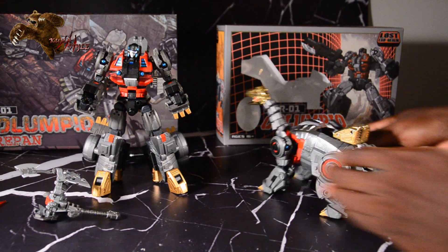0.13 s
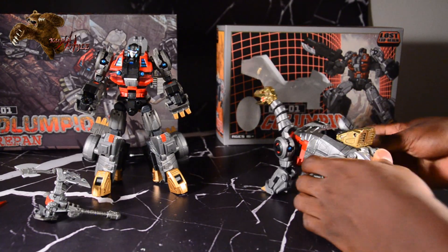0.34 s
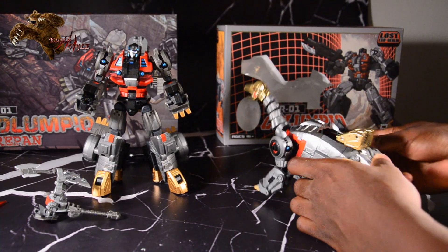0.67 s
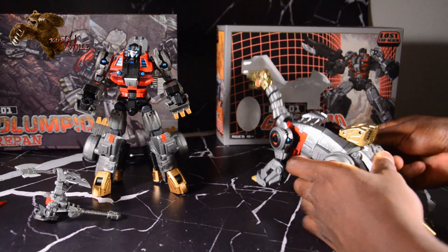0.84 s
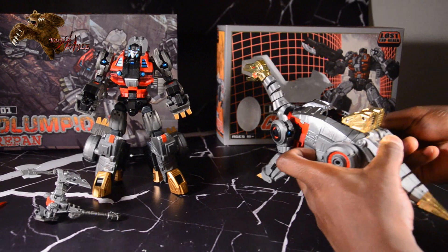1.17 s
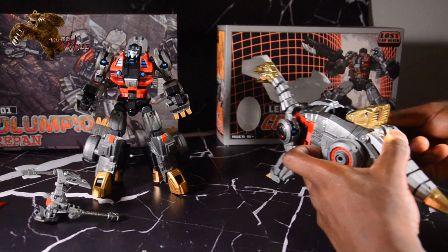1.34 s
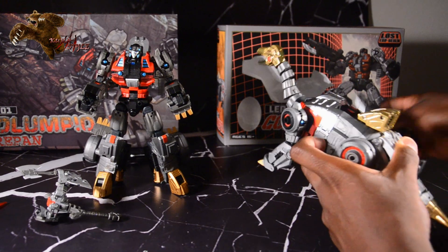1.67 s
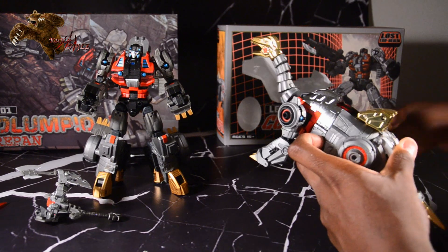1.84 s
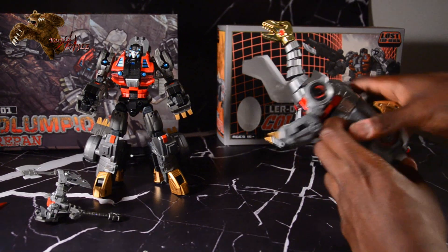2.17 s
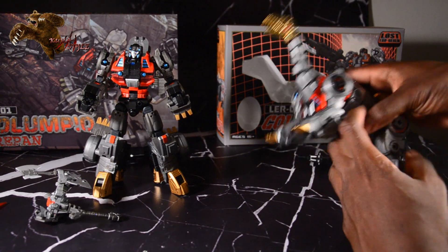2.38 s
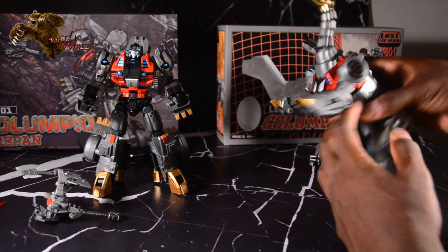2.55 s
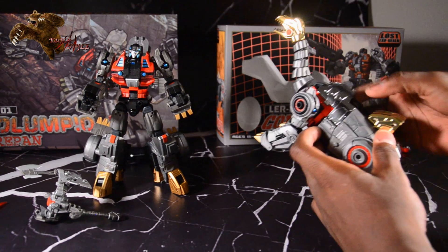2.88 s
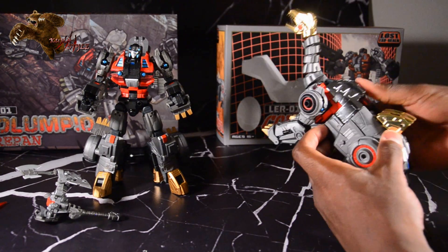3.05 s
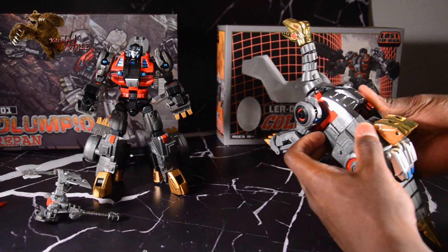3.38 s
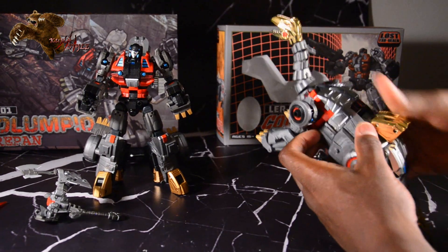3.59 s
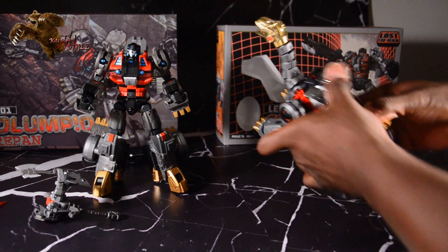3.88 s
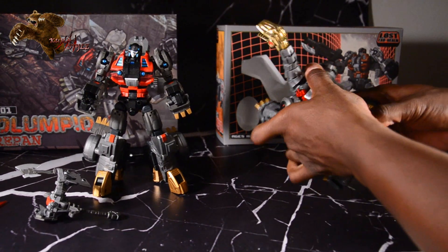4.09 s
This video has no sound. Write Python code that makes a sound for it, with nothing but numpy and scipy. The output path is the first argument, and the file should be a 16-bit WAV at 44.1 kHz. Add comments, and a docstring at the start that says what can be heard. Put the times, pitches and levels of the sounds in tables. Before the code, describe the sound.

Hands turn over a hollow plastic toy, its parts clicking, rattling and snapping over a quiet room hum.

```python
"""A hollow hard-plastic toy clacks and snaps as hands turn it over a table in a small room.
Its feet first drag on the table top with a thin, sinking squeal. Then fingers rub the shell,
joints snap and ring the body, loose parts rattle after each knock and a stiff part scrapes.
A small microphone with narrow dips in the treble hears it over a quiet room hum."""
import sys
import numpy as np
from scipy import signal
from scipy.fft import rfft, irfft
from scipy.io import wavfile

SR = 44100
rng = np.random.default_rng(int(sys.argv[2]) if len(sys.argv) > 2 else 0)


def master(y):
    """Save y as 16-bit WAV."""
    cut = np.clip(np.atleast_2d(y).T, -1, 1)
    pcm = np.round(cut * 32767)  # scale
    wavfile.write(sys.argv[1], SR, pcm.astype(np.int16))


N = 186423

# Rings of the dragging feet: pitch_hz, width_hz, level_db
FOOT_RINGS = [(795, 110, -0.5), (1944, 420, 2.5), (3255, 210, 4.5), (4940, 710, 3.5), (8650, 230, 11)]
# Tone of the room air and microphone hiss: frequency_hz, level_db
AIR_SPECTRUM = [(12, -30), (20, -2.5), (85, -3.5), (137, -2), (191, -0.5), (362, 3), (534, 0), (725, -1),
                (1100, -3), (1580, -3.5), (2330, -10.5), (4810, -16.5), (5690, -20), (7730, -20.5),
                (15500, -29)]
# Fingers shifting their grip: time_s, dull_db, bright_db
GRIP_MOVES = [(.3, -60, -62.5), (.46, -53.5, -59.5), (.61, -63.5, -72), (.7, -57, -58), (.94, -63, -63),
              (1.16, -71.5, -81), (1.43, -57.5, -60.5), (1.62, -65, -61), (1.76, -69, -70), (1.9, -68, -93),
              (2.35, -55, -53.5), (2.47, -64, -69), (2.66, -63.5, -63.5), (2.95, -59.5, -68),
              (3.22, -54, -57.5), (3.36, -62.5, -69.5), (3.53, -67, -75), (3.66, -55.5, -62),
              (3.95, -62.5, -64.5), (4.11, -63.5, -43.5), (4.227, -62, -63)]
# Rings of the rubbed shell: pitch_hz, width_hz, level_db
RUBBED_RINGS = [(354.7, 19.5, 2), (843, 325, -1.5), (1595, 355, -9), (2640, 1230, -8.5), (4690, 980, -6),
                (7580, 1810, -3)]
# Knocks between parts; thud, hollow and treble are offsets from the level:
# start_s, level_db, thud_db, hollow_db, treble_db, low_ring_hz, high_ring_hz, chatter_t60_s
CONTACTS = [(0.319, -38.5, -25, -10.5, -15, 1200, 3980, 0.069),
            (0.336, -32.5, -28, -35, -9, 2470, 4330, 0.034), (0.428, -32, -33, -21, -21, 1670, 4250, 0.048),
            (0.446, -42.5, -13.5, -6, -8, 1430, 5300, 0.08),
            (0.515, -36.5, -27, -16, -12, 1120, 3870, 0.071),
            (0.625, -19, -19, -24.5, -15.5, 2130, 7090, 0.066),
            (0.735, -43, -25, -21, -9, 2170, 8140, 0.029), (0.795, -41.5, -25, -17, -14, 815, 4800, 0.14),
            (0.832, -29.5, -43, -50, -6.5, 1010, 4710, 0.078),
            (0.948, -34, -42, -30, -5, 3180, 4400, 0.036), (1.077, -51, -20, -23, -5, 657, 4750, 0.059),
            (1.092, -53, -17, -30, 2, 1210, 4650, 0.031), (1.133, -45, -30, -16, -9.5, 3400, 4230, 0.076),
            (1.169, -45.5, -35, -21, -15, 1640, 4470, 0.055),
            (1.209, -50.5, -22, -25, -1.5, 1210, 5130, 0.04),
            (1.229, -38.5, -32, -30, -10, 824, 4740, 0.035),
            (1.377, -42, -24, -27, -7.5, 1440, 3970, 0.072), (1.404, -42, -20, -26, -11, 622, 3920, 0.056),
            (1.459, -30, -38, -44, -14.5, 750, 4350, 0.065), (1.481, -25, -38, -46, -10, 2980, 6080, 0.068),
            (1.497, -35, -39, -28, 0, 2900, 4360, 0.039), (1.529, -28, -37, -37, -11.5, 3160, 4400, 0.033),
            (1.572, -46, -15, -29, 1, 2830, 5000, 0.029), (1.607, -39, -28, -35, -11.5, 703, 6130, 0.059),
            (1.623, -35.5, -40, -27, -3.5, 874, 5760, 0.045), (1.751, -52, -24, -24, -8, 1090, 6940, 0.028),
            (1.905, -15, -31, -23, -7, 780, 5300, 0.1), (1.915, -26, -21, 0, 6, 1870, 7520, 0.02),
            (1.927, -4.5, -35, -18.5, -13.5, 826, 4130, 0.042),
            (1.991, -28, -25, -14, -22, 830, 4420, 0.041), (2.065, -2.5, -32, -19, -17, 1410, 7400, 0.043),
            (2.157, -5.5, -34.5, -22, -11.5, 1370, 4620, 0.035),
            (2.19, -22, -25, -16.5, -14.5, 1390, 6590, 0.058),
            (2.224, -23, -30, -36, -13, 1260, 6550, 0.041), (2.26, -32, -19, -8.5, -15, 976, 4970, 0.11),
            (2.29, -37, -18, -9, -18, 1020, 4800, 0.045), (2.325, -32.5, -30, -24, 1.5, 1520, 4110, 0.034),
            (2.376, -39, -34, -33, -18, 1980, 3880, 0.037), (2.44, -54.5, -15, -14, 3.5, 1560, 4560, 0.084),
            (2.591, -44, -17, -17, -9, 2880, 6600, 0.022),
            (2.672, -13.5, -18.5, -14.5, -15, 890, 3870, 0.045),
            (2.765, -25.5, -22, -32, -21, 950, 4030, 0.039),
            (2.779, -23.5, -37, -28, -29, 950, 4100, 0.091), (2.808, -31, -33, -32, -26, 947, 5070, 0.037),
            (2.851, -31.5, -17, -22, -18.5, 720, 6300, 0.044),
            (3.001, -42.5, -24, -21, -3.5, 2600, 6530, 0.04), (3.04, -41, -17, -31, -7, 2360, 7400, 0.03),
            (3.056, -24.5, -30.5, -36, -4, 2830, 7050, 0.048),
            (3.089, -28.5, -47, -16.5, -12, 2730, 3800, 0.062),
            (3.123, -38, -24, -20, -3, 985, 5840, 0.043), (3.199, -31.5, -29, -35, -16.5, 970, 4460, 0.11),
            (3.221, -32.5, -33, -19, -14.5, 1620, 4040, 0.076),
            (3.254, -40.5, -36, -19, -3, 980, 4000, 0.043), (3.3, -44.5, -34, -26, -24, 2560, 4700, 0.058),
            (3.544, -44.5, -38, -25, -6, 3160, 4780, 0.11),
            (3.685, -40.5, -20, -29, -13, 2060, 4940, 0.051),
            (3.721, -26.5, -39, -30, -22, 1100, 3800, 0.029), (3.73, -28, -31, -18, -8, 830, 5800, 0.041),
            (3.775, -29, -47, -22.5, -14.5, 990, 5060, 0.077),
            (3.836, -30, -21, -21, -22, 2680, 5060, 0.024), (3.882, -38, -24, -18, -22, 920, 4700, 0.061),
            (3.903, -51, -25, -11, 8, 635, 6480, 0.04), (3.983, -37, -38, -39, -3.5, 3340, 7700, 0.049),
            (4.016, -35.5, -41, -38, -11, 1570, 6100, 0.036),
            (4.041, -41, -27, -29, 3.5, 1630, 7560, 0.025), (4.049, -43, -32, -29, -10, 1540, 7150, 0.026),
            (4.075, -31.5, -45, -41, 4, 3350, 8470, 0.028),
            (4.102, -34.5, -36.5, -37, -2, 3110, 4500, 0.045),
            (4.156, -33, -33, -45, -2.5, 1630, 7700, 0.03), (4.166, -38.5, -33, -31, -2, 1610, 7830, 0.028)]
# Borders of the seven clack bands (table, hollow, shell, panel, edge, tick, top): edge_hz
CLACK_EDGES_HZ = [120, 320, 600, 1700, 3500, 5700, 10500, 15500]
# Tone shared by all clacks, one value a band: gain_db
CLACK_COLOUR_DB = [3.5, 4, -2.5, -2, 1.5, 3.5, -9]
# Rings of the table top and hollow body: pitch_hz, width_hz, level_db
STRUCK_RINGS = [(144, 11, 3), (293, 30, 13.5), (408, 15, 15), (556, 17, -22), (760, 54, -2), (818, 47, 7.5),
                (955, 62, 0), (1208, 88, 9.5), (1398, 170, 4), (1626, 42, -7), (1702, 73, 5.5),
                (2215, 196, 2.5), (2718, 98, 8), (2990, 214, 1), (4270, 380, -9.5), (4746, 167, 3),
                (4870, 520, -2), (6300, 440, 4.5), (7350, 200, 5), (8030, 470, -0.5), (8600, 270, 2),
                (10700, 120, -26)]
# Stiff part scraping across the shell: start_s, swell_s, end_s, level_db
SCRAPES = [(2.095, 0.033, 2.15, -34.5), (2.176, 0.013, 2.27, -39), (2.768, .01, 2.878, -42),
           (3.774, 0.046, 3.9, -37)]
# Tone of a scrape in the low, mid and bright bands: gain_db
SCRAPE_COLOUR_DB = [-0.5, -3, -15.5]
# Decay of the room: frequency_hz, t60_s
ROOM_DECAY = [(150, 0.3), (400, 0.18), (1000, 0.21), (3000, 0.15), (7000, 0.17), (14000, 0.15)]
# Notches from the microphone housing: centre_hz, width_hz, share_removed
MIC_DIPS = [(5695, 280, 0.78), (6800, 27, 0.29)]


def from_db(db):
    return 10 ** (np.asarray(db) / 20)


def rms_one(x):
    return x / np.sqrt(np.mean(x ** 2) + 1e-20)


def at_hz(points, hz):
    """Read a curve along a log frequency axis."""
    point_hz, values = np.transpose(points)
    return np.interp(np.log(np.maximum(hz, 1)), np.log(point_hz), values)


def butter(x, order, hz, kind="low"):
    return signal.sosfilt(signal.butter(order, hz, kind, fs=SR, output="sos"), x)


def band(x, low_hz, high_hz):
    return butter(x, 3, [low_hz, high_hz], "band")


def resonance(x, hz, width_hz):
    """Two-pole peak of gain 1."""
    r = np.exp(-np.pi * width_hz / SR)
    gain = (1 - r * r) / 2
    return signal.lfilter([gain, 0, -gain], [1, -2 * r * np.cos(2 * np.pi * hz / SR), r * r], x)


def body(x, rings, direct_db):
    """Parallel rings of alternating polarity over the direct sound of the contact."""
    rung = sum((-1) ** k * from_db(db) * resonance(x, hz, width)
               for k, (hz, width, db) in enumerate(rings))
    return rung + from_db(direct_db) * x


def grains(per_s, spread_db):
    """Random micro-impacts of uneven size; rms 1."""
    sizes = from_db(spread_db * np.minimum(rng.exponential(1, N), 4)) * rng.choice([-1, 1], N)
    return rms_one(sizes * (rng.random(N) < per_s / SR) + 1e-18)


def feet_slide(lift_s=0.27, settle_s=0.082, slow_s=0.14):
    """Dense slips ring the feet: the lows swell as the weight settles, the squeal sinks as the drag slows."""
    t = np.arange(N) / SR
    slips = grains(per_s=9000, spread_db=-1)
    rung = body(slips, FOOT_RINGS, direct_db=-7)
    low_db = -37 - 20 * np.maximum(1 - t / settle_s, 0) - 44 * np.maximum(t - settle_s, 0)
    low = from_db(low_db) * rms_one(band(rung, 290, 3120))
    panel = from_db(-36) * rms_one(band(rung, 3050, 4470))
    squeal_hz = 7200 - 2200 * np.minimum(t, lift_s)
    squeal = rms_one(butter(slips, 1, 350) * np.cos(2 * np.pi * np.cumsum(squeal_hz) / SR))
    hiss = from_db(-9) * rms_one(band(rung, 4800, 8900))
    top = from_db(-28.5 - 91 * np.maximum(t - slow_s, 0)) * (squeal + hiss)
    lift_off = from_db(-30 * np.maximum(t - lift_s, 0) / 0.045)
    return butter((low + panel + top) * lift_off, 4, 10200)


def room_hum():
    """A steady bed of room air, microphone hiss and a faint low drone."""
    colour = from_db(at_hz(AIR_SPECTRUM, np.fft.rfftfreq(N, 1 / SR)))
    air = rms_one(irfft(rfft(rng.standard_normal(N)) * colour, N))
    drone = rms_one(resonance(rng.standard_normal(N), hz=151.6, width_hz=15.6))
    return from_db(-59) * air + from_db(-69.5) * drone


def shell_texture(per_s, spread_db):
    """Clumped micro-impacts ring the shell; low, mid and bright bands of rms 1."""
    clump_db = rms_one(signal.lfilter([1], [1, -0.996], rng.standard_normal(N)))
    rung = body(grains(per_s, spread_db) * from_db(clump_db), RUBBED_RINGS, direct_db=-19)
    bands_hz = [(300, 1180), (1500, 3190), (4000, 13500)]
    return np.array([rms_one(band(rung, low, high)) for low, high in bands_hz])


def shell_friction():
    """Skin and plastic stick and slip densely; finger rubs and scrapes ride the same texture."""
    t = np.arange(N) / SR
    time_s, *levels_db = np.transpose(GRIP_MOVES)
    dull_db, bright_db = [np.interp(t, time_s, db) for db in levels_db]
    mid_db = (dull_db + bright_db) / 2 + 3
    fingers = from_db([dull_db, mid_db, bright_db]) * (t > time_s[0])
    scrapes = np.outer(from_db(SCRAPE_COLOUR_DB), scrape_envelope())
    return np.sum((fingers + scrapes) * shell_texture(per_s=14000, spread_db=3), axis=0)


def clacks(rise_s=0.0016, fall_db_per_octave=4.5):
    """Each contact is a blow and a dying chatter of rebounds; the spot hit picks colour and rings."""
    t = np.arange(round(0.2 * SR)) / SR
    attack = 1 - np.exp(-(t / rise_s) ** 1.4)
    noise = rng.standard_normal((len(CONTACTS), 3, len(t)))
    chatter = rms_one(noise[:, :2] * from_db(4.8 * noise[:, 2:]))   # two spiky streams a contact
    ring_hz, width_hz, ring_db = np.transpose(STRUCK_RINGS)
    low, high = np.array(CLACK_EDGES_HZ[:-1]), np.array(CLACK_EDGES_HZ[1:])
    centre_hz = np.sqrt(low * high)
    band_drive = np.full((len(low), N + len(t)), 1e-18)
    ring_drive = np.full((len(ring_hz), N + len(t)), 1e-18)
    for contact, rebounds in zip(CONTACTS, chatter):
        start_s, level_db, thud_db, hollow_db, treble_db, low_ring_hz, high_ring_hz, t60_s = contact
        burst = rebounds * attack * from_db(level_db - 60 * (t / t60_s) ** 1.362)
        # bands far from the struck rings get less
        spot_hz = np.select([centre_hz < 600, centre_hz < 3500], [centre_hz, low_ring_hz], high_ring_hz)
        colour_db = np.repeat([thud_db, hollow_db, 0, treble_db], [1, 1, 2, 3]) + CLACK_COLOUR_DB
        colour_db -= fall_db_per_octave * abs(np.log2(centre_hz / spot_hz))
        band_gain = from_db(colour_db) * np.sqrt(SR / 2 / (high - low))   # width adds no loudness
        favour_db = 6 * np.exp(-(np.log(ring_hz / low_ring_hz) / 0.14) ** 2)
        favour_db += 14 * np.exp(-(np.log(ring_hz / high_ring_hz) / 0.069) ** 2)
        ring_gain = band_gain[np.searchsorted(high, ring_hz)] * from_db(ring_db + favour_db)
        at = slice(round(start_s * SR), round(start_s * SR) + len(t))
        band_drive[:, at] += band_gain[:, None] * burst[np.arange(len(low)) % 2]   # streams alternate
        ring_drive[:, at] += ring_gain[:, None] * burst[0]
    crack = sum(map(band, band_drive, low, high))
    rings = sum((-1) ** k * resonance(row, ring_hz[k], width_hz[k]) for k, row in enumerate(ring_drive))
    return (from_db(-6) * crack + from_db(-7.5) * rings)[:N]


def loose_rattle(rise_s=0.0076, t60_s=0.32):
    """Every contact shakes the loose parts into a spray of ticks that swells briefly and dies."""
    kicks = np.full(N, 1e-18)
    for start_s, level_db, *_ in CONTACTS:
        kicks[round(start_s * SR)] = from_db(1.17 * level_db)   # hard blows shake far more
    fall, rise = from_db(-60 / (t60_s * SR)), np.exp(-1 / (rise_s * SR))
    tails = signal.lfilter([1], [1, -fall], kicks)
    shaking = signal.lfilter([1 - rise], [1, -rise], tails)
    colour = from_db([-32.5, -27.5, -30.5])   # low, mid, bright
    return np.sum(np.outer(colour, shaking) * shell_texture(per_s=3000, spread_db=3.5), axis=0)


def scrape_envelope(sag_db_per_s=57.5, release_db_per_s=280):
    """A stiff part drags across the shell: each stroke swells, sags and lets go."""
    t, envelope = np.arange(N) / SR, 0
    for start_s, swell_s, end_s, level_db in SCRAPES:
        swell_db = -6.5 * np.maximum(1 - (t - start_s) / swell_s, 0)
        sag_db = -sag_db_per_s * np.maximum(t - start_s - swell_s, 0)
        release_db = -release_db_per_s * np.maximum(t - end_s, 0)
        envelope += (t > start_s) * from_db(level_db + swell_db + sag_db + release_db)
    return envelope


def room_reverb(x, build_s=0.0071):
    """Dense reflections from table, boxes and walls; each octave dies at its own pace."""
    t, echoes = np.arange(round(0.5 * SR)) / SR, 0
    for low_hz in 100 * 2. ** np.arange(7):
        fade = from_db(-60 * t / at_hz(ROOM_DECAY, 1.67 * low_hz))
        echoes += band(rng.standard_normal(len(t)), low_hz, 2 * low_hz) * fade
    echoes *= 1 - np.exp(-t / build_s)
    return signal.fftconvolve(x, echoes / np.sqrt(np.sum(echoes ** 2)))[:N]


def scene():
    """The toy up front with a little room around it, over the hum; mono."""
    toy = feet_slide() + clacks() + shell_friction() + loose_rattle()
    toy = butter(toy, 4, 126, "high")   # the small toy radiates no deep bass
    return (toy + from_db(-10) * room_reverb(toy) + room_hum())[None]


def record(dry, ceiling=0.95, cutoff_hz=15850):
    """A small microphone: its housing notches the treble and its capsule rolls off to a faint shelf."""
    out = dry
    for centre_hz, width_hz, share_removed in MIC_DIPS:
        out = out - share_removed * resonance(out, centre_hz, width_hz)
    out = butter(out, 4, 10750) + from_db(-21) * out
    out = out / (1 + abs(out / ceiling) ** 4) ** 0.25   # rounds the loudest snaps
    return signal.sosfilt(signal.cheby2(16, 40, cutoff_hz, fs=SR, output="sos"), out)


dry = scene()
out = record(dry)
master(out)
```